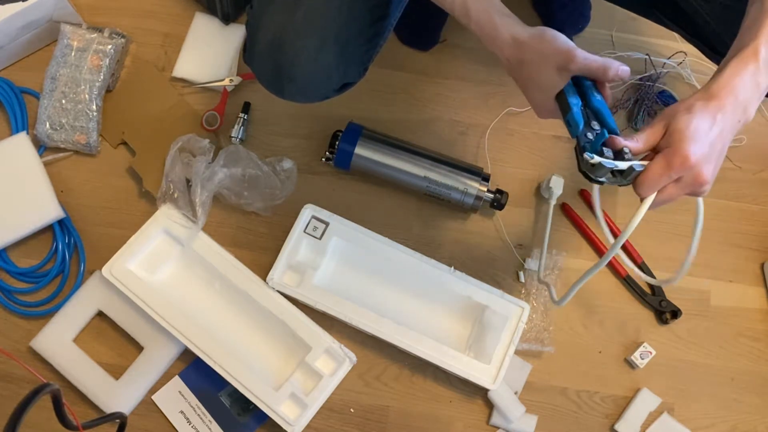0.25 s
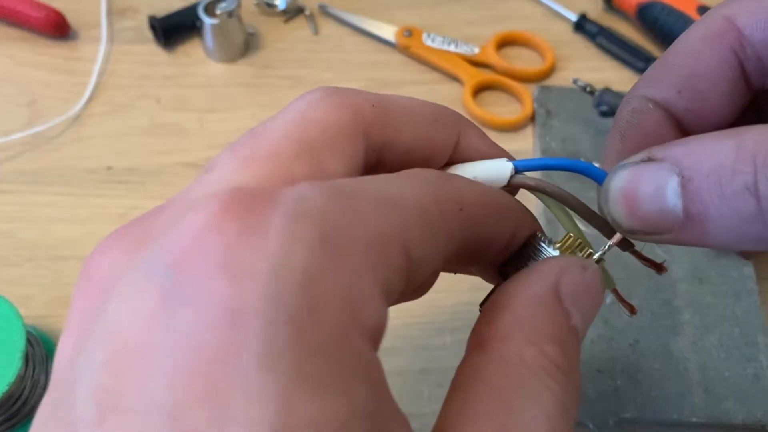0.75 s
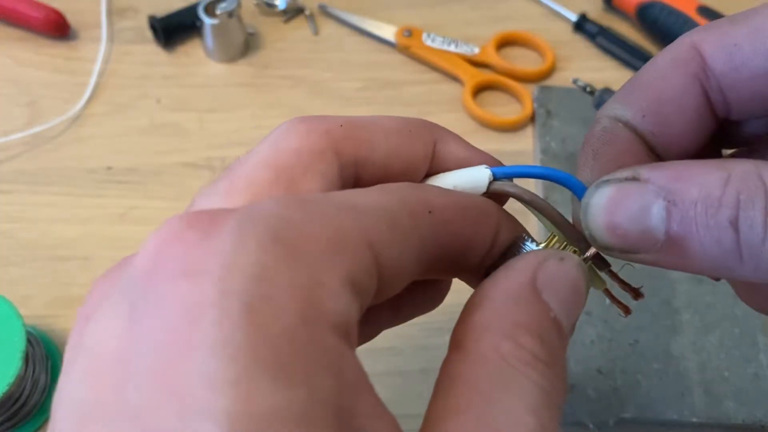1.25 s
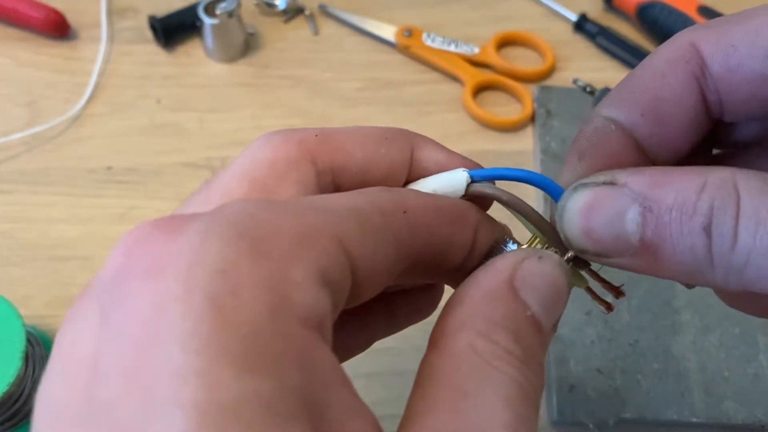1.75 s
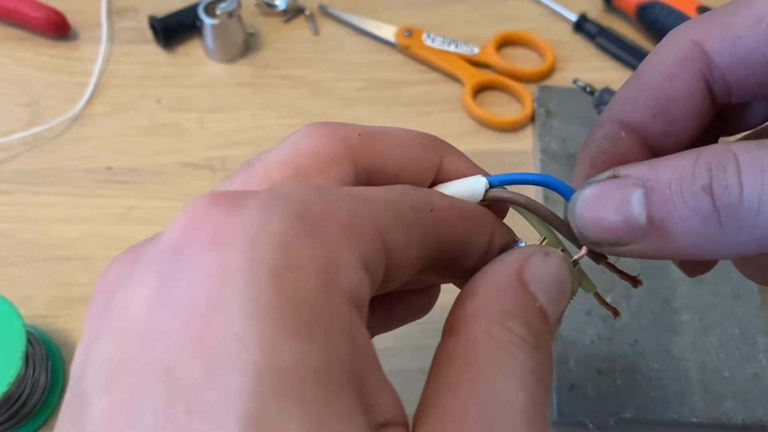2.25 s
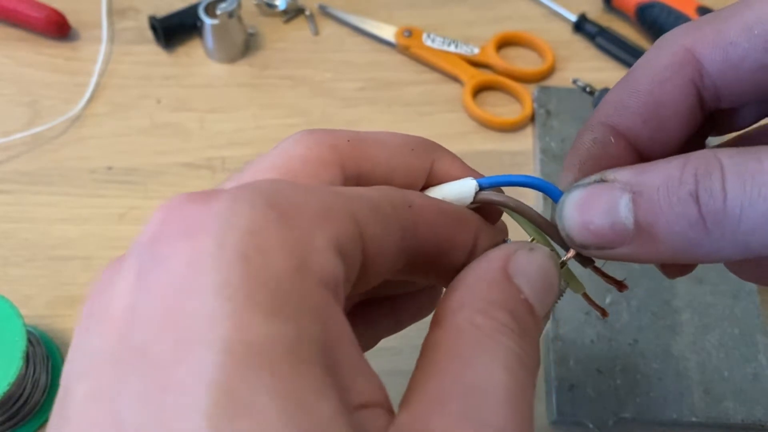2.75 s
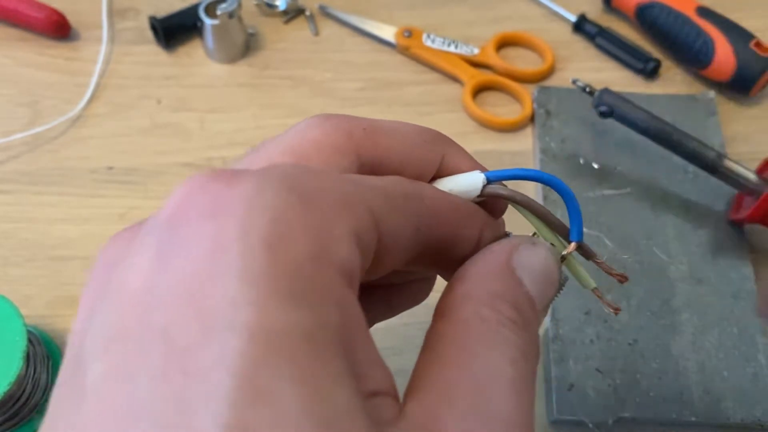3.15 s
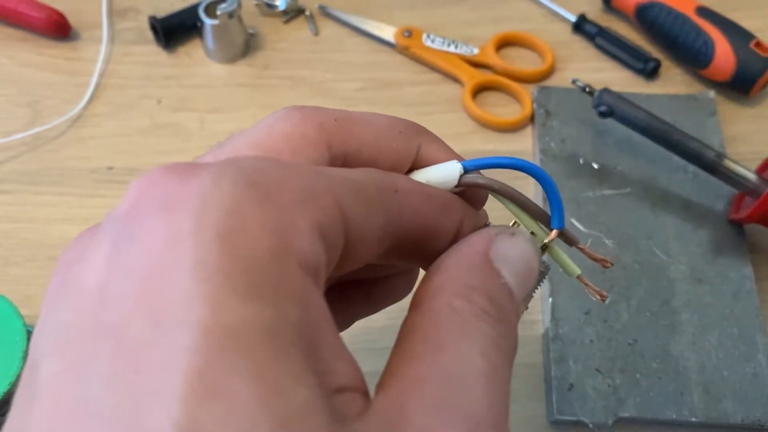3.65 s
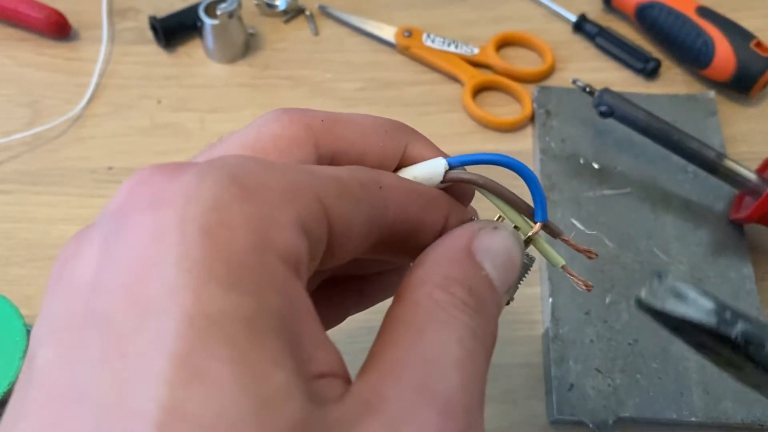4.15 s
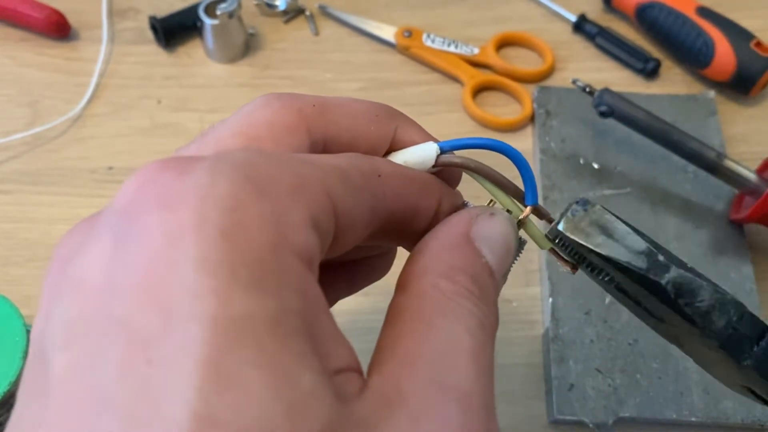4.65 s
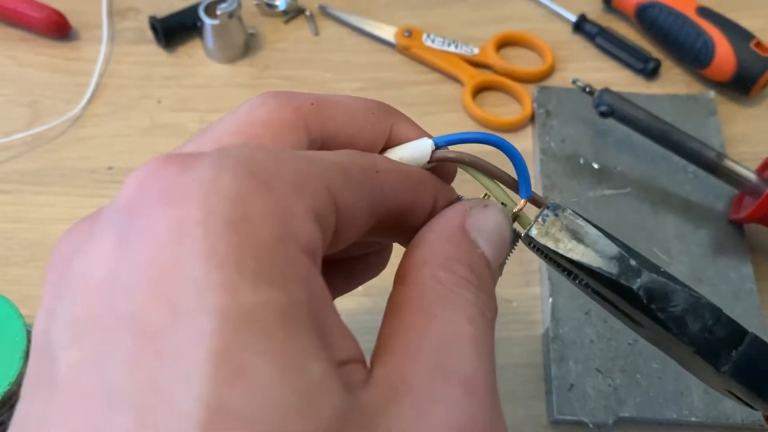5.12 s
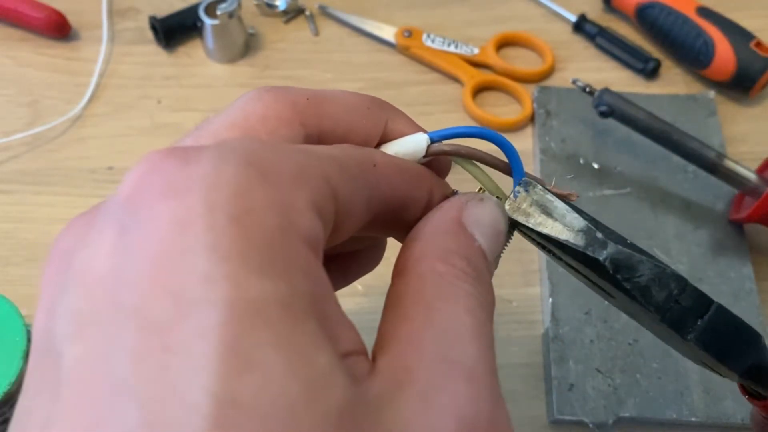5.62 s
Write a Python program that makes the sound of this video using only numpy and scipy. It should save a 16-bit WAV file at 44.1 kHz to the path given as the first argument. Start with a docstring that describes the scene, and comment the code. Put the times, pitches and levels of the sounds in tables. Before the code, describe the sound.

In a small room, a hand wire stripper clicks over soft knocks, hisses on cable sleeve and snaps loudly around half a second. A hard cut leaves faint low hum and hiss with sparse tiny wire ticks. Around three and a half seconds pliers knock and drag on a wooden bench, then light ticks and rubs finish. Close phone microphone from above, stereo.

```python
"""A wire stripper clicks, its blades hiss on the sleeve and the clicks ring on, over soft knocks, and it snaps:
band-passed noise bursts and random slips. At a splice this stops dead and a faint hum of narrow-band noise begins;
rumble and hiss run throughout. Fingers and plier jaws tick and rub on copper strands, one singing thinly; then
pliers strike the wooden top (damped modes, sharp ticks) and drag over it (stick-slip), before the last ticks and rubs.
A phone with two microphone ports listens from above in a small room."""
import sys
import numpy as np
from scipy import signal
from scipy.fft import rfft, irfft, next_fast_len
from scipy.io import wavfile
from scipy.ndimage import uniform_filter1d

SR = 44100
rng = np.random.default_rng(int(sys.argv[2]) if len(sys.argv) > 2 else 0)


def generate_wav(signal):
    """Clip the signal to [-1, 1] and save it as 16-bit WAV at the path in sys.argv[1]."""
    frames = np.transpose(np.atleast_2d(signal))
    scaled = np.clip(frames, -1, 1) * 32767
    pcm = np.round(scaled).astype(np.int16)
    wavfile.write(sys.argv[1], SR, pcm)


N = 259308
TIME = np.arange(N) / SR
SIZE = next_fast_len(N)
HZ = np.maximum(np.arange(SIZE // 2 + 1) * SR / SIZE, 1)
SPLICE_S = .5425


def undb(db):
    """Amplitude ratio of a level in decibels."""
    return 10 ** (np.asarray(db) / 20)


def on_log(table):
    """Interpolation on a logarithmic frequency axis."""
    hz, value = np.transpose(table)
    return np.interp(np.log(HZ), np.log(np.maximum(hz, 1)), value)


def colour(x, gain):
    """Linear filtering: multiply the spectrum by a gain, then normalise to rms 1."""
    y = irfft(rfft(x, SIZE) * gain, SIZE)[..., :N]
    return y / np.sqrt(np.mean(y ** 2))


def band(x, lo_hz, hi_hz):
    """Causal band-pass filtering, normalised to peak 1."""
    sos = signal.butter(2, [lo_hz, hi_hz], "bandpass", fs=SR, output="sos")
    y = signal.sosfilt(sos, x)
    return y / np.abs(y).max()


def resonance(hz, width_hz):
    """Resonance curve: gain falls to half at half a width from the centre."""
    return 1 / (1 + (2 * (HZ - hz) / width_hz) ** 2)


def add(track, s, sound):
    """Superposition: mix a sound in at time s."""
    i = int(s * SR)
    track[..., i:i + sound.shape[-1]] += sound[..., :N - i]


def grains(per_s, spread_db):
    """Stick-slip friction as random impulses: a few big slips among many small."""
    slip = rng.random(N) < per_s / SR
    return slip * rng.standard_normal(N) * undb(spread_db * rng.standard_exponential(N))


def curve(tables):
    """Amplitude envelope from level curves, silent between them."""
    gain = sum(undb(np.interp(TIME, *np.transpose(table), -200, -200)) for table in tables)
    return uniform_filter1d(gain, size=130)


def strokes(table, rise_db_s, fall_db_s, axis=2):
    """Exponential growth, hold and decay: levels change linearly in dB."""
    out = np.zeros(N)
    t = np.arange(SR // 2) / SR - .1  # zero when a stroke reaches full level
    for row in table:
        rise_db = rise_db_s * np.minimum(t, 0)
        fall_db = fall_db_s * np.maximum(t - max(row[1], 0), 0)
        add(out, row[0] + t[0], undb(row[axis] + rise_db - fall_db))
    return out


# stripper jaws: t/s, level/dB, 1.5-3 kHz share/dB, 9-16.5 kHz share/dB, t60/s; shares are relative to 3-9 kHz
JAW_SNAPS = [(0.044, -45, -23, 0, .012), (0.1024, -47.5, 0, -6, .012), (.1200, -36, -17, 11, .008),
             (0.4408, -41.5, -10.5, -5.5, .012), (0.4565, -31, -22.5, 0, .012),
             (0.4687, -26, -17.5, 9.5, .012), (0.4704, -33, -15, -0.5, .01),
             (0.5375, -13, -18.5, -19.5, .024), (0.5419, -17.5, -7, 3, .009)]
# hiss of the blades on the sleeve and the fading ring after the clicks, as two curves: t/s, level/dB
HISS_AND_RING = [
    [(.043, -88), (.047, -65), (.1, -71), (.105, -64), (.125, -55.5), (.16, -66.5), (.25, -89.5)],
    [(.438, -78), (.442, -54.5), (.455, -59.5), (.46, -52), (.472, -41.5), (.49, -51), (.52, -54.5),
     (.535, -53), (.542, -44)],
]
# spectrum of this hiss and ring: f/Hz, relative level/dB
HISS_AND_RING_SPECTRUM = [(500, -24), (1200, -11), (2500, -1.5), (5000, -1), (8000, 3), (11000, -3),
                          (14000, -7), (16500, -15.5)]


def stripper():
    """Impulsive release: jaw snaps over grainy noise, the blades' hiss and the clicks' fading ring."""
    noise = colour(grains(20000, 0.91), undb(on_log(HISS_AND_RING_SPECTRUM)))
    out = noise * curve(HISS_AND_RING)
    for s, *snap in JAW_SNAPS:
        add(out, s, click(*snap))
    return out


def click(db, dull_db, bright_db, t60):
    """Impulsive excitation: a sharp step, then an exponentially dying chatter, in three bands."""
    t = np.arange(2048) / SR
    burst = 0.41 * rng.standard_normal(2048) * undb(-60 * t / max(t60, .002))
    burst[0] = 1
    middle = band(burst, 3000, 9000)
    dull = undb(dull_db) * band(burst, 1500, 3200)
    bright = undb(bright_db) * band(burst, 9000, 16500)
    return undb(db) * (middle + dull + bright)


# ticks of strands and plier jaws, and the sharp tick of blows on wood:
# t/s, level/dB, 1.5-3 kHz share/dB, 9-16.5 kHz share/dB, left minus right/dB
SHARP_TICKS = [(1.114, -56.5, -6, 6, 1), (1.2245, -45.5, -2, -15, 1), (1.586, -62, -5.5, 11.5, 1),
               (1.677, -61.5, 2, -1.5, 0), (1.819, -58.5, -15.5, 8.5, 0), (1.904, -48, -26, 2.5, 1),
               (1.945, -60, -19.5, -10, 6.5), (2.0405, -41.5, -24, 3, 3.5), (2.75, -60.5, -3.5, -23.5, 4),
               (2.9183, -62, -13, 8.5, 3), (3.028, -58, -24.5, 7.5, 3), (3.396, -50.5, -7, 5.5, 1),
               (3.4667, -44, 24.5, 1, 0), (3.5526, -43.5, 8.5, -14, 1), (3.64, -46.5, 4, -10, 5),
               (3.724, -52, 7.5, -8, -1), (3.794, -63, 5, -2, 6), (3.9036, -44.5, 14.5, -30, 0),
               (4.113, -52.5, -11.5, -1, 4), (4.333, -51, -6, 1, -1.5), (4.81, -60.5, -12.5, 3, 6),
               (4.908, -61.5, -10, 7.5, 3.5), (5.1737, -48, -9.5, -4, -0.5),
               (5.502, -56.5, -19.5, -10.5, 3), (5.5745, -42, -12.5, 4, 3.5), (5.647, -60, -14.5, 7, 0),
               (5.668, -67.5, 7.5, -11, 13), (5.776, -56.5, -18, 6, 3), (5.806, -58, -11, 9, 5)]
TICK_T60_S = 0.0066
# skin and jaws rubbing on wire: t/s at full level, hold/s, level/dB
WIRE_RUBS = [(1.118, 0.0044, -71.5), (1.215, 0.019, -61.5), (1.59, 0.0037, -78), (1.68, 0.048, -85.5),
             (1.81, .004, -77.5), (1.91, 0.035, -80.5), (2.044, .003, -74), (3.012, .006, -78.5),
             (3.07, .03, -82), (4.81, 0.0037, -75.5), (4.92, 0.0038, -73), (5.165, 0.01, -69),
             (5.285, 0.037, -68), (5.35, 0.024, -78.5), (5.495, .02, -71), (5.58, 0.0042, -65.5),
             (5.67, 0.0053, -71), (5.75, 0.043, -77.5)]
RUB_RISE_DB_S, RUB_FALL_DB_S = 2500, 804
# spectrum of the rubbing: f/Hz, relative level/dB
RUB_SPECTRUM = [(500, -30), (1200, -2.5), (2300, -3.5), (4000, -10.5), (6600, -5), (8500, 1), (10300, 5.5),
                (12500, -9), (16500, -18)]
# a strand sings thinly while it is twisted: t/s at full level, hold/s, level/dB
STRAND_SINGS = [(1.115, .01, -75.5), (1.23, .05, -86), (1.565, .03, -83.5), (1.678, 0.031, -84.5),
                (1.76, 0.056, -98), (3.03, .004, -83)]
SING_HZ, SING_WIDTH_HZ = 6570, 140
SING_RISE_DB_S, SING_FALL_DB_S = 1500, 400


def strands_and_ticks():
    """Friction, resonance and impulses: patchy rubbing, a singing strand, and ticks of wire, jaws and blows."""
    slips = grains(4000, 3.0)
    sing = colour(rng.standard_normal(N), resonance(SING_HZ, SING_WIDTH_HZ))
    sing = sing * strokes(STRAND_SINGS, SING_RISE_DB_S, SING_FALL_DB_S)
    rub = colour(slips, undb(on_log(RUB_SPECTRUM))) * strokes(WIRE_RUBS, RUB_RISE_DB_S, RUB_FALL_DB_S)
    out = np.tile(rub + sing, (2, 1))
    for s, *tick, pan_db in SHARP_TICKS:
        pan = undb([[pan_db / 2], [-pan_db / 2]])
        add(out, s, click(*tick, TICK_T60_S) * pan)
    return out


# blows on wood: t/s, level/dB, contact/ms, boom share/dB, hollow share/dB
WOOD_BLOWS = [(0.097, -49, 1.3, -13.5, -6), (.107, -47, 3, -13.5, 4), (0.137, -50, 1.7, -13.5, 6),
              (.161, -52.5, 2.8, -12.5, 6.5), (.185, -59, 5.3, -8.5, 1.5), (0.213, -65, 4, -1, 5.5),
              (1.118, -54, 4, -11, -10.5), (1.22, -49, 1.6, -14.5, -11), (3.395, -30, 3.9, 5.5, 4.5),
              (3.4672, -15, 0.36, -5.5, -2.5), (3.551, -30.5, 0.84, 6, -7), (3.639, -35.5, 0.2, 2, -3),
              (3.669, -42.5, 3.3, 11.5, 15), (3.721, -38, 0.11, 4.5, 2.5), (3.735, -41.5, 1.9, -1.5, 35),
              (3.754, -39.5, 2.4, -14, -7), (3.812, -44.5, 2.9, -28, 26), (3.855, -34, 1.3, 0, 15.5),
              (3.902, -18, 0.88, -13.5, -5.5), (3.927, -29.5, 3, -9.5, 2.5), (3.983, -40.5, 1.4, -8, 3),
              (3.999, -47, 0.7, 12.5, 4.5), (4.009, -43.5, 2.6, 7.5, 4.5), (5.171, -57.5, 0.62, -10, -9.5)]


def knocks():
    """Impact excitation: each blow is a smooth push; a longer contact excites the high modes less."""
    out = np.zeros(N)
    for s, db, contact_ms, *shares_db in WOOD_BLOWS:
        decay_s = max(contact_ms, .05) / 4000  # a quarter of the contact
        push = np.exp(-np.arange(600) / SR / decay_s)
        ring = signal.fftconvolve(bench_ring(*shares_db), np.convolve(push, push))
        add(out, s, undb(db) * ring / np.abs(ring).max())
    return out


# modes of the bench top, scattered a little at each blow: f/Hz, relative level/dB, t60/s before the loss limit
BENCH_MODES = [(66, -6, 0.12), (102.14, -6.5, 0.24), (148, -2, 0.086), (230, -1.5, 0.1), (298, -7.5, 0.14),
               (352.3, -3, 0.05), (438, 2, 0.045), (518, -1, 0.079), (583, -13, 0.08), (687, -13.5, 0.13),
               (792, -4.5, 0.064), (886, -6, 0.062), (984, -3.5, 0.056), (1115, -3, 0.016),
               (1267, -8.5, 0.071), (1467, -2.5, .045), (1620, -5, 0.023), (1770, -8, 0.084),
               (2117, -8.5, 0.078), (2220, -11, 0.049), (2510, -8, 0.079), (2755, -11, .05),
               (3008, -27.5, .04), (3680, -16, 0.12)]
BOOM_HZ, HOLLOW_HZ = 190, 550  # modes below the first boom, those between sound hollow
WOOD_LOSS = 110  # cycles a mode can ring at most before it has lost 60 dB


def bench_ring(boom_db, hollow_db):
    """Modal superposition: the top's impulse response as damped sines, with a rattle."""
    hz, db, t60 = np.transpose(BENCH_MODES)[:, :, None]
    level_chance, pitch_chance = rng.standard_normal((2, len(BENCH_MODES), 1))
    t = np.arange(SR // 3) / SR
    share_db = np.where(hz < BOOM_HZ, boom_db, hollow_db * (hz < HOLLOW_HZ))
    decay_db = 60 * t / np.clip(t60, .01, WOOD_LOSS / hz)
    gain = undb(db + 2 * level_chance + share_db - decay_db)
    sign = (-1) ** np.arange(len(BENCH_MODES))[:, None]  # neighbouring modes start in opposite sense
    sines = np.sin(2 * np.pi * hz * (1 + 0.0071 * pitch_chance) * t)
    ring = np.sum(sign * gain * sines, axis=0)
    return ring / np.abs(ring).max() + rattle(size=len(t))


CRACK_DB, CRACK_T60_S = -14.5, 0.0088  # the first instant of steel on wood
RATTLE_DB, RATTLE_HZ, RATTLE_T60_S = -6.5, 2794, 0.2  # loose tools and fibres that buzz after a blow


def rattle(size):
    """Exponentially decaying noise: a broad crack and a longer, dense dull buzz."""
    t, noise = np.arange(size) / SR, rng.standard_normal((2, size))
    crack = band(noise[0] * undb(-60 * t / CRACK_T60_S), 400, 20000)
    buzz = band(noise[1] * undb(-60 * t / RATTLE_T60_S), 630, RATTLE_HZ)
    return undb(CRACK_DB) * crack + undb(RATTLE_DB) * buzz


# short strokes of the pliers over the top: t/s at full level, hold/s, wood level/dB, grit level/dB
PLIER_DRAGS = [(3.56, 0.0043, -62, -64.5), (3.628, 0.035, -53.5, -57), (3.715, 0.0071, -52, -68.5),
               (3.748, 0.0062, -45, -66), (3.825, 0.036, -42, -51.5), (3.92, 0.018, -39, -57),
               (3.99, 0.016, -43, -60), (4.11, 0.0066, -77.5, -67)]
DRAG_RISE_DB_S, DRAG_FALL_DB_S = 552.5, 605.5
# spectrum of the grit: f/Hz, relative level/dB
GRIT_SPECTRUM = [(500, 4.5), (1000, 3.5), (2500, 3), (4000, -2.5), (6000, -10), (8000, -8.5), (11000, -12),
                 (16500, -15.5)]


def drag():
    """Stick-slip excitation: slips shake the wood, damped by the pliers' weight; grit rasps above."""
    damped = bench_ring(-1, 0) * undb(-60 * np.arange(SR // 3) / SR / 0.19)
    slips = grains(900, 1.5)
    wood = colour(signal.fftconvolve(slips, damped)[:N], 1 / (1 + (HZ / 900) ** 2))
    grit = colour(grains(13000, 3.1), undb(on_log(GRIT_SPECTRUM)))
    wood = wood * strokes(PLIER_DRAGS, DRAG_RISE_DB_S, DRAG_FALL_DB_S, axis=2)
    return wood + grit * strokes(PLIER_DRAGS, DRAG_RISE_DB_S, DRAG_FALL_DB_S, axis=3)


# diffuse tail by band: f/Hz, t60/s, relative level/dB
ROOM_TAIL = [(113, .3, -25.5), (300, 0.95, -26.5), (1050, 0.43, -18.5), (2950, 0.32, -17),
             (9100, 0.39, -25)]
EARLY_DB, EARLY_T60_S = 10.5, 0.042  # bench and hands close by reflect first; decays on top of the tail's own


def room(x):
    """Diffuse reverberation: exponentially decaying noise, independent at each port, banded in decay."""
    t = np.arange(SR // 2) / SR
    tail = 0
    for hz, t60, db in ROOM_TAIL:
        sos = signal.butter(2, [hz / 1.9, min(hz * 1.9, 20000)], "bandpass", fs=SR, output="sos")
        noise = signal.sosfilt(sos, rng.standard_normal((2, len(t))))
        onset = np.minimum(t / .0015, 1)
        tail = tail + undb(db - 60 * t / t60) * noise * onset
    early = 1 + undb(EARLY_DB - 60 * t / EARLY_T60_S)
    return signal.fftconvolve(x[None], tail * undb(-20.5) * early, axes=1)[:, :N]


# rumble spectrum: f/Hz, relative level/dB
RUMBLE_SPECTRUM = [(15, -10), (30, -4.5), (48, -1), (65, -4), (110, -6.5), (170, -7.5), (230, -10),
                   (310, -11.5), (400, -21), (500, -14.5), (650, -21), (850, -25.5), (1300, -27.5),
                   (2500, -34.5), (5000, -51.5)]
RUMBLE_DB = -69
# left-right coherence of the rumble, limited to 0.98: f/Hz, coherence/0-1
RUMBLE_COHERENCE = [(60, 1), (130, 0.83), (290, 0.6), (640, 0.3), (1410, 0.05), (3100, 0.15), (6820, 0.04),
                    (15000, 1)]
# hum after the splice: f/Hz, width/Hz, level/dB midway between the ports
HUM_BANDS = [(66.6, 47, -75), (232.4, 15, -71.5), (437.2, 34, -89.5), (815, 34, -91.5)]
# steady hiss: f/Hz, relative level/dB
HISS_SPECTRUM = [(300, -4.5), (1000, -3.5), (3000, -7.5), (6500, -9.5), (9000, -13.5), (11000, -14.5),
                 (13300, -16.5), (16500, -24)]
HISS_DB = -86.5
HISS_SHARED_DB = 0.5  # part that enters through both ports, against the part each capsule makes alone


def room_tone():
    """Partially coherent noise: rumble alike at both ports in the bass, a wavering hum, steady hiss."""
    like = np.clip(on_log(RUMBLE_COHERENCE), 0, .98)
    mid = rfft(rng.standard_normal(N), SIZE) * np.sqrt(1 + like)
    side = rfft(rng.standard_normal(N), SIZE) * np.sqrt(1 - like)
    rumble = irfft(np.array([mid + side, mid - side]), SIZE)
    rumble = undb(RUMBLE_DB) * colour(rumble, undb(on_log(RUMBLE_SPECTRUM)))
    hum = np.zeros(N)
    for hz, width_hz, db in HUM_BANDS:
        hum += undb(db) * colour(rng.standard_normal(N), resonance(hz, width_hz))
    hum = hum * undb([[-1.5], [1.5]]) * (TIME > SPLICE_S)
    shared = undb(HISS_SHARED_DB) * ports(rng.standard_normal(N), BENCH_PHASE_LEAD, BENCH_TILT)
    own = rng.standard_normal((2, N))
    hiss = undb(HISS_DB) * colour(shared + own, undb(on_log(HISS_SPECTRUM)))
    return rumble + hum + hiss


# phase between the ports, before and after the splice: f/Hz, left lead/rad
STRIPPER_PHASE_LEAD = [(0, 0), (780, 0.3), (1120, -0.5), (3530, -0.3), (3880, -0.6), (4390, -0.2),
                       (5600, -2.0), (6460, -4.9), (6980, -6.4), (10100, -11.0), (11900, -13.9),
                       (14300, -17.1), (15900, -19.9), (16700, -18.8)]
BENCH_PHASE_LEAD = [(0, 0), (950, .3), (1550, -6.2), (7060, -6.3), (9560, -10.2), (13700, -16.3),
                    (16700, -19.5)]
# balance of the ports, before and after the splice: f/Hz, left minus right/dB
STRIPPER_TILT = [(60, 2), (110, -1), (200, 0), (380, 5.5), (700, -2), (1290, -1), (2380, 3.5), (4400, 1.5),
                 (8120, 2.5), (15000, 0.5)]
BENCH_TILT = [(60, 2), (110, -2), (200, -2), (380, -4.5), (700, -7), (1290, -1.5), (2380, -0.5),
              (4400, 8.5), (8120, 0.5), (15000, -0.5)]


def ports(x, phase, balance):
    """Inter-channel phase and level differences, split evenly between two ports."""
    lead = np.exp(.5j * np.interp(HZ, *np.transpose(phase))) * undb(on_log(balance) / 2)
    return irfft(rfft(x, SIZE) * np.array([lead, 1 / lead]), SIZE)[:, :N]


def scene():
    """Superposition of direct and diffuse sound; the stripper's part and its echo stop at the splice."""
    early = TIME < SPLICE_S
    blows = knocks()
    first = stripper() + blows * early
    first = ports(first, STRIPPER_PHASE_LEAD, STRIPPER_TILT) + room(first)
    wood = blows * ~early + drag()
    sharp = strands_and_ticks()
    left = ports(wood + sharp[0], BENCH_PHASE_LEAD, BENCH_TILT)[0]
    right = ports(wood + sharp[1], BENCH_PHASE_LEAD, BENCH_TILT)[1]
    second = np.array([left, right]) + room(wood + sharp.mean(axis=0))
    cut = uniform_filter1d(1. * early, size=20)
    return first * cut + second + room_tone()


LOW_CUT_HZ, TOP_HZ = 56, 16600


def record(dry):
    """Band limiting: the phone drops the deepest bass and cuts the top steeply."""
    thin = signal.sosfilt(signal.butter(3, LOW_CUT_HZ, "highpass", fs=SR, output="sos"), dry)
    return signal.sosfilt(signal.ellip(10, .2, 80, TOP_HZ, fs=SR, output="sos"), thin)


dry = scene()
out = record(dry)
generate_wav(out)
```